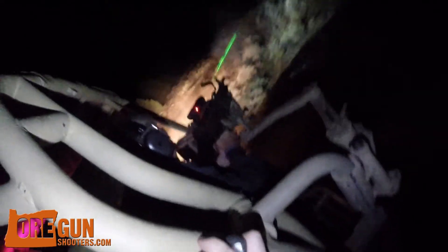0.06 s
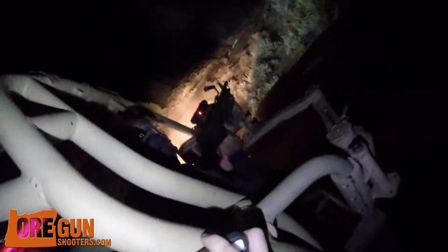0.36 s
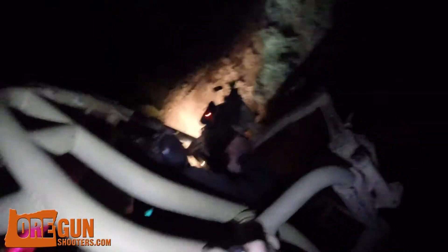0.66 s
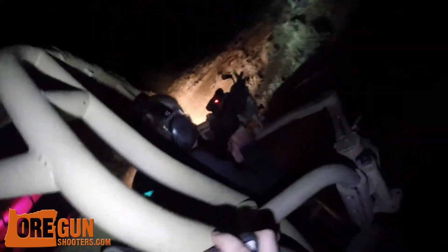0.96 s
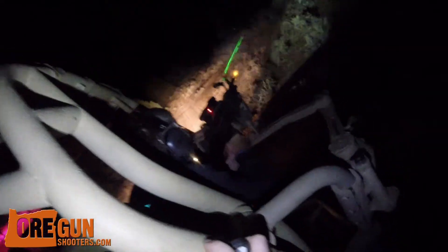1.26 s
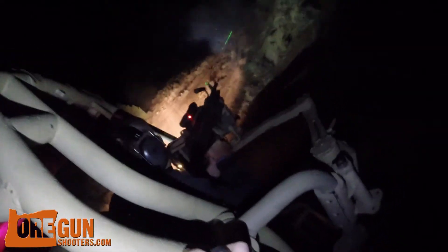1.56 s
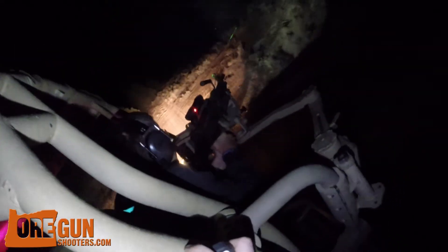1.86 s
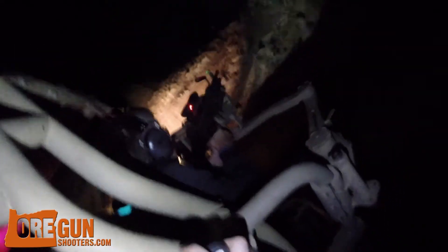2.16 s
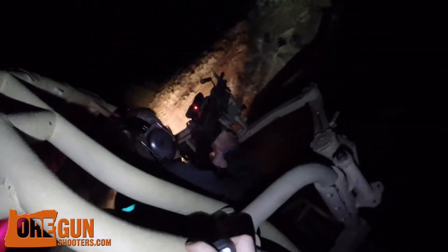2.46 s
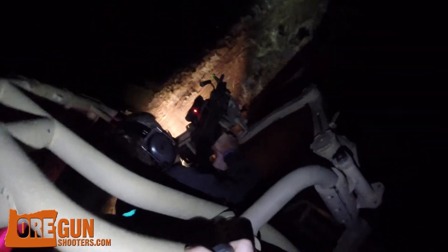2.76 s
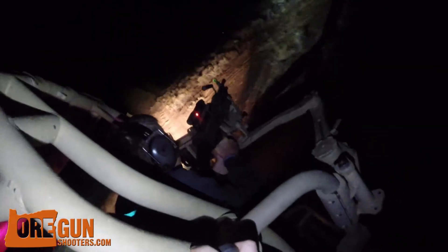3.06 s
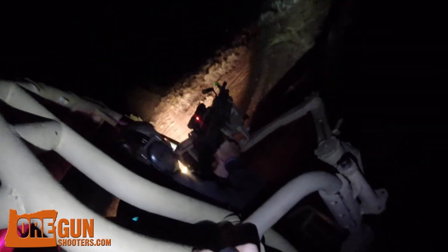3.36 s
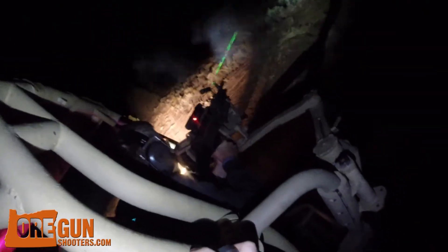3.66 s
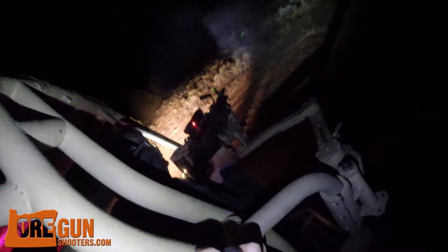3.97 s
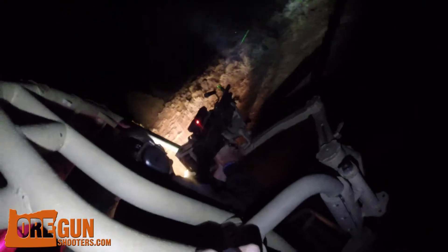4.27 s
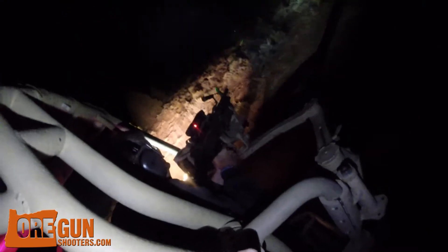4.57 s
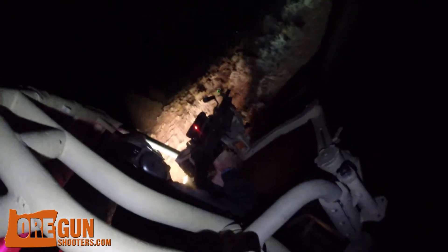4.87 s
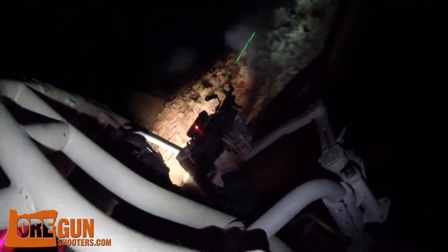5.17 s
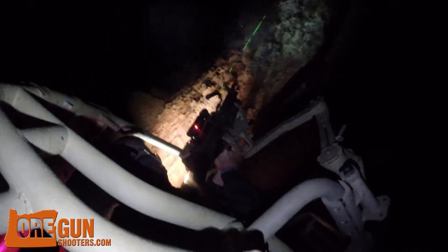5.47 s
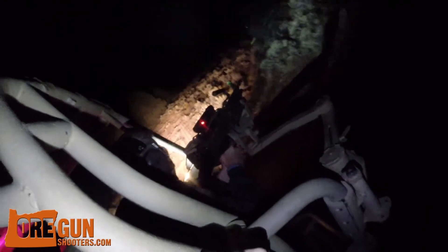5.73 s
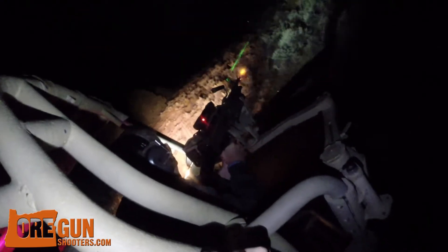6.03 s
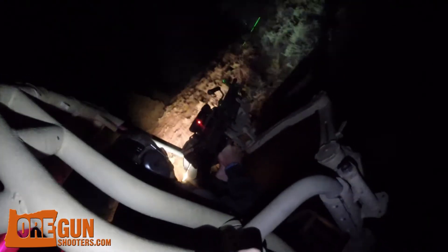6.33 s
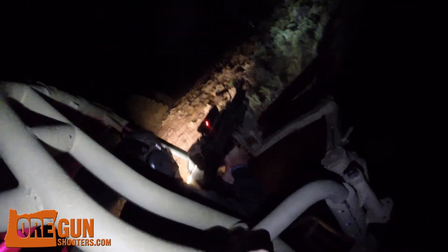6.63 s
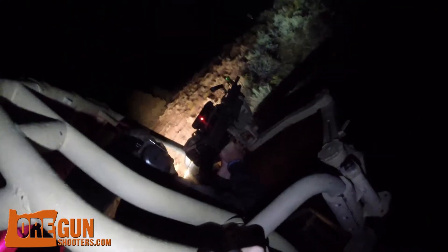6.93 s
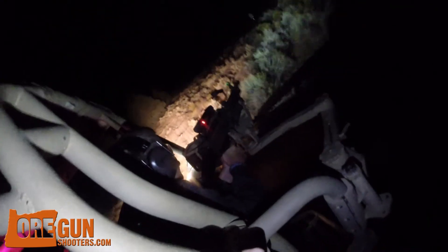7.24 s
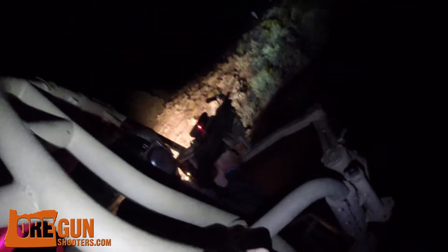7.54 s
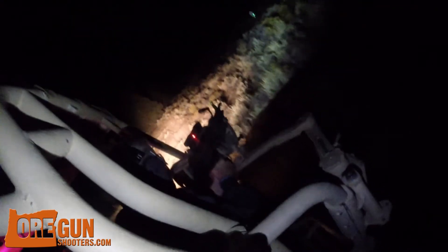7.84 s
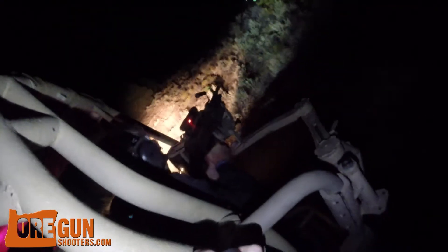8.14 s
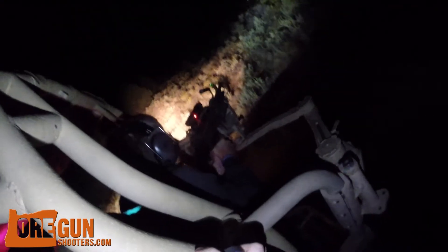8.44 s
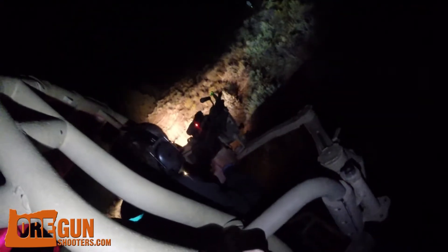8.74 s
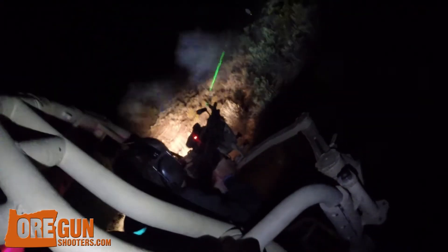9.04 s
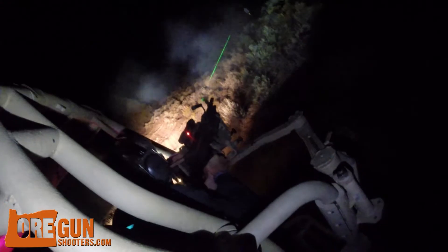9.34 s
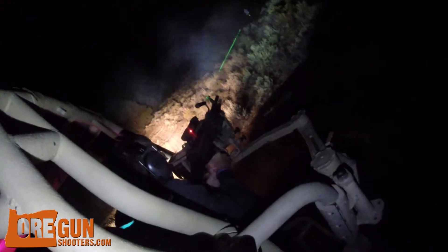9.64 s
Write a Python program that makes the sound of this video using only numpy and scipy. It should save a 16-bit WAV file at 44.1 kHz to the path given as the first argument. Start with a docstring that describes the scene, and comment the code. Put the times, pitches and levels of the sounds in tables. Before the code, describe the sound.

A two-cylinder off-road vehicle engine drones low in open country, with faint belt and gear whines. A light machine gun fires close to the microphone: two rounds right at the start, three at 1.3 seconds and three at 3.6. Two more come at 5.1, a single shot at 5.5 and two at 6.1. Each shot is a sharp, overloaded crack with a bolt clack and a brief ring from the vehicle's frame. Belt links and spent cases knock and ping on the panels, most clearly around 6.4 and 9.1 seconds. Brush and a far hillside return echoes lasting up to two seconds, with faint bullet slaps and ricochets. The engine ducks under each burst and swells back. From about 6.5 seconds it slows, dropping to idle by 9, when a final four-round burst fires and echoes away.

```python
"""Open country at night, aboard an off-road vehicle whose two-cylinder engine drones, then falls to idle.
A light machine gun fires short bursts: the bolt slides forward, each muzzle blast rings the frame,
and belt links and spent cases drop on the panels. Brush and a far hillside return the reports,
bullets slap into the slope, and the drive belt and gears whine faintly. Every shot overloads
the microphone, and the gain control ducks the engine and lets it swell back."""
import sys
import numpy as np
from scipy.fft import rfft, irfft, next_fast_len
from scipy.io import wavfile
from scipy.ndimage import uniform_filter1d, minimum_filter1d, map_coordinates

SR = 44100
rng = np.random.default_rng(int(sys.argv[2]) if len(sys.argv) > 2 else 0)


def put_to_file(sound):
    """Save the sound as 16-bit audio at rate SR, in the file named by the first command-line argument."""
    columns = np.atleast_2d(sound).T  # one column per channel
    safe = np.clip(columns, -1, 1)
    whole_steps = np.round(safe * 32767)
    wavfile.write(sys.argv[1], SR, whole_steps.astype(np.int16))


N = 427769


def amp(db):
    """Decibels to amplitude."""
    return np.exp(np.asarray(db) * (np.log(10) / 20))


def along(points, hz):
    """Read an EQ curve of (f/Hz, level/dB) points on a log frequency axis."""
    freqs, levels = np.transpose(points)
    return np.interp(np.log(hz + 1), np.log(freqs + 1), levels)


def wobble(rate, step=12):
    """Smooth random modulation, rate knots a second."""
    steps = np.arange(0, N, step)
    knots = rng.standard_normal(int(N * rate / SR) + 4)
    return np.interp(np.arange(N), steps, map_coordinates(knots, [steps * rate / SR]))


def filtered(x, response):
    """Pass x through a complex frequency response."""
    size = next_fast_len(len(x) + 8192)
    return irfft(rfft(x, size) * response(np.fft.rfftfreq(size, 1 / SR)), size)[:len(x)]


def noise(spectrum):
    """Coloured noise of rms 1."""
    x = filtered(rng.standard_normal(N), lambda hz: amp(along(spectrum, hz)))
    return x / np.sqrt(np.mean(x ** 2) + 1e-20)


def add(track, s, sound):
    """Mix a sound into a track at s seconds."""
    start = max(round(s * SR), 0)
    track[start:start + len(sound)] += sound[:max(N - start, 0)]


def fade(t, t60):
    """A decay that falls 60 dB in t60 seconds."""
    return np.exp(-np.log(1000) * t / t60)


def puffs(events, spectrum, rise, t60):
    """A noise hit at each (t/s, level/dB); overlapping hits add in power."""
    t = np.arange(int((t60 + rise) * SR)) / SR
    envelope = -np.expm1(-t / rise) * fade(t, t60)
    power = np.zeros(N)
    for s, db in events:
        add(power, s, (amp(db) * envelope) ** 2)
    return np.sqrt(power) * noise(spectrum)


# engine speed, cruising and then falling to idle: t/s, working-cycle rate/Hz
CRUISE = [(0.0, 35.2), (0.62, 33.6), (1.02, 35.2), (1.28, 34.2), (4.49, 33.6), (5.9, 33.1)]
SLOWDOWN = [(6.35, 33.2), (7.23, 30.6), (7.76, 30.5), (7.92, 28.2), (8.17, 24.3), (8.55, 22.6),
            (8.91, 16.8), (9.25, 14.7), (9.7, 14.2)]
# the engine's harmonics: multiple of the cycle rate, level/dB
ENGINE_HARMONICS = [(1, -16), (2, -1), (3, -10), (4, 0.5), (5, -11), (6, -11.5), (7, -11.5), (8, -10),
                    (9, -17), (10, -13), (11, -17), (12, -9), (13, -11), (15, -11.5), (16, -10), (18, -16),
                    (20, -10)]
# EQ of the exhaust pipe, the engine clatter and the jolting chassis: f/Hz, level/dB
PIPE_EQ = [(14, -3.5), (40, 1), (70, 0.5), (120, 9), (137, 2), (165, -16.5), (240, -3.5), (340, -10),
           (460, -6), (600, -11.5), (800, -16)]
CLATTER_EQ = [(30, -18.5), (100, -9), (180, -15.5), (280, -17.5), (450, -19.5), (700, -22.5), (1050, -27),
              (1500, -22.5), (1800, -28), (2600, -32), (4700, -38), (7400, -44), (8500, -51),
              (11500, -50.5), (14500, -63.5), (16000, -78.5)]
RUMBLE_EQ = [(5, -19.5), (14, 5.5), (28, -2), (50, -14), (110, -15), (200, -23), (500, -51), (1500, -100)]


def engine(cruise_hz=34, step=30):
    """Crank harmonics drone through the exhaust, clatter beats with the firings, the chassis rumbles."""
    speed = np.interp(np.arange(N) / SR, *np.transpose([*CRUISE, *SLOWDOWN]))
    octaves_down = np.log2(cruise_hz / speed)  # slower is quieter and less even
    unevenness = .003 + .017 * octaves_down ** 2
    angle = 2 * np.pi * np.cumsum(speed * (1 + unevenness * wobble(12))) / SR
    exhaust = np.zeros(N)
    for k, db in ENGINE_HARMONICS:
        strength = np.repeat(amp(db + along(PIPE_EQ, k * speed[::step])), step)[:N]
        exhaust += strength * np.cos(round(k) * angle - .12 * k * k)  # the pipe smears each pulse
    exhaust *= amp(-40 - 7.5 * octaves_down + .94 * wobble(9.3))
    beat = 1 + .19 * np.cos(angle) + .12 * np.cos(2 * angle)
    clatter = amp(-48 - 7 * octaves_down + .71 * wobble(9.9)) * beat * noise(CLATTER_EQ)
    rumble = amp(-43.5 - 1.5 * octaves_down + 1.2 * wobble(2.5)) * noise(RUMBLE_EQ)
    return exhaust + clatter + rumble


# trigger pulls and their impacts: t/s, rounds, shot spacing/s, shot to strike/s, strike level/dB,
# strike to ricochet/s, ricochet level/dB, impact change per round as the aim drifts/dB
BURSTS = [(0.0605, 2, .0807, .458, -37, .11, -47, 7.5), (1.28, 3, .0804, .296, -32, .146, -29.5, 0),
          (3.634, 3, .0792, .341, -20, .172, -23, -9), (5.0965, 2, .0789, .19, -29, .14, -39, 0),
          (5.4622, 1, .08, .175, -27.5, .145, -31.5, 0), (6.1389, 2, .0849, .254, -27.5, .15, -45, 2.5),
          (8.948, 4, .0797, .292, -25, .15, -39, -3)]


def shots(first_heard_db=1.62):
    """Evenly spaced shots as (t/s, level/dB); each burst's first is heard slightly louder."""
    return np.array([(start + k * period, first_heard_db * (k == 0))
                     for start, count, period, *_ in BURSTS for k in range(round(count))])


# EQ of the bolt's scrape and clack: f/Hz, level/dB
BOLT_EQ = [(200, -18.5), (2000, -9), (3300, 1), (4600, -6), (7500, -5), (11000, -12), (15000, -23.5),
           (16000, -49)]


def bolt(lead_s=.045, pause_s=.15, ping_hz=3250):
    """Before a burst the sear pings free and the bolt scrapes forward; it clacks shut on every round."""
    times = shots()[:, 0]
    t = np.arange(int(lead_s * SR)) / SR
    stroke = amp(np.interp(t, [0, .011, .014, .024, .04], [-42, -48.5, -34.5, -45, -39]))
    ping = amp(-17.5) * np.sin(2 * np.pi * ping_hz * t) * -np.expm1(-t / .0067) * fade(t, .014)
    travel, sear = np.zeros(N), np.zeros(N)
    for s in times[np.diff(times, prepend=-1) > pause_s]:
        add(travel, s - lead_s, stroke)
        add(sear, s - lead_s, ping)
    closings = shots() - [.006, 0]  # 6 ms ahead of each blast
    clack = amp(-17.5) * puffs(closings, BOLT_EQ, rise=.0005, t60=.014)
    return travel * noise(BOLT_EQ) + sear + clack


# resonances of the vehicle's frame and panels: f/Hz, width/Hz, level/dB
FRAME_MODES = [(239, 170, -4.5), (448, 130, -5.5), (655.7, 130, -4.5), (851, 190, 0), (1261.5, 280, 0.5),
               (1619, 210, -8), (1990, 170, -4), (2283, 170, 0), (2747, 510, -4.5), (3420, 890, -8),
               (3835, 350, -1.5), (4910, 350, -4), (5170, 130, -16), (6427, 170, -9), (10130, 620, -24.5),
               (11100, 690, -26.5)]
# EQ of the muzzle gas's crack and of its scatter off the ground: f/Hz, level/dB
CRACK_EQ = [(30, -19), (110, -10.5), (250, 4), (3000, 2), (6500, 0.5), (8000, -11.5), (11500, -9),
            (15000, -20.5), (16500, -43)]
GROUND_EQ = [(30, -11.5), (100, -10), (180, -6), (420, 6.5), (700, 0.5), (1250, 6.5), (2000, -2.5),
             (4000, -11), (7000, -18), (11000, -33), (15000, -30.5)]


def muzzle_blast():
    """Each shock front rings the frame alike; turbulent gas and ground scatter vary from shot to shot."""
    def frame(hz):
        response = 0
        for k, (centre, width, db) in enumerate(FRAME_MODES):
            resonance = 1j * hz * width / (centre ** 2 - hz ** 2 + 1j * hz * width)
            # squared, each resonance builds up briefly, as reflections arrive
            response += (-1) ** k * amp(db) * resonance ** 2
        return response

    shocks = np.zeros(N)
    for s, db in shots():
        add(shocks, s, -amp([db + 47]))
    gas = amp(12) * puffs(shots(), CRACK_EQ, rise=.00049, t60=.023)
    ground = amp(-2.5) * puffs(shots(), GROUND_EQ, rise=.003, t60=.078)
    return filtered(shocks, frame) + gas + ground


# EQ of the scatter off the brush and of all sound from the hillside: f/Hz, level/dB
BRUSH_EQ = [(40, -9.5), (150, -1.5), (500, 1.5), (1500, -6), (2800, -8), (6500, -7.5), (8200, -14),
            (11000, -18), (15000, -29), (16000, -60.5)]
HILL_EQ = [(60, -12), (500, -14), (1500, 0), (4000, -2), (6800, -7.5), (8300, -22.5), (10500, -19.5),
           (13000, -41), (16000, -49)]


def echoes():
    """Uneven terrain returns the reports in lumps: a short tail from brush, a long one from the hill."""
    brush = amp(-18.5 + 2 * wobble(110)) * puffs(shots(), BRUSH_EQ, rise=.0033, t60=.42)
    hill = amp(-41 + 1.8 * wobble(45)) * puffs(shots(), HILL_EQ, rise=.05, t60=2.02)
    return brush + hill


# EQ of a knock on a panel: f/Hz, level/dB
KNOCK_EQ = [(100, -15), (500, -9.5), (900, -1.5), (1350, 1), (2200, -8.5), (4000, -13.5), (6500, -15),
            (8000, -27), (15000, -42.5)]


def belt_links(bounces=4, settle_db_per_s=34):
    """Every round throws out a belt link that bounces a few times, later bounces tending softer."""
    thrown = np.repeat(shots()[:, 0], bounces)
    lateness, softness = rng.random((len(thrown), 2)).T
    delay = .047 + .51 * lateness
    level_db = -18.5 - settle_db_per_s * delay - 10 * softness
    return puffs(zip(thrown + delay, level_db), KNOCK_EQ, rise=.0008, t60=.04)


# the loudest cases landing: t/s, knock level/dB, ring level/dB, ring focus f/Hz
CASE_LANDINGS = [(.217, -12, -55, 8300), (.425, -36, -50, 7300), (.803, -40, -43, 4900),
                 (1.498, -11, -56, 10300), (4.028, -27, -48, 8300), (6.349, -17, -62, 8300),
                 (6.412, -2.5, -41.5, 10300), (6.493, -16, -54, 8300), (9.077, -2, -43, 10300)]
# the ring of a spent case: f/Hz, level/dB, t60/s
BRASS_MODES = [(4900, -1, .12), (7080, -8, .7), (8290, -7, .75), (10290, -3, .38), (10620, -2, .18),
               (11500, -5, .1), (12420, -3, .26)]


def spent_cases(focus_db_per_octave=24, flutter_db=3):
    """Brass knocks on a panel; the spot struck decides which mode rings most, tumbling adds flutter."""
    t, ring = np.arange(SR) / SR, np.zeros(N)
    for s, _, ring_db, focus_hz in CASE_LANDINGS:
        for hz, db, t60 in BRASS_MODES:
            tumble = np.interp(t, np.linspace(0, 1, 90), rng.standard_normal(90))
            off_focus_db = focus_db_per_octave * abs(np.log2(hz / focus_hz))
            level_db = ring_db + db - off_focus_db + flutter_db * tumble
            add(ring, s, amp(level_db) * np.sin(2 * np.pi * hz * t + tumble) * fade(t, t60))
    knocks = puffs([row[:2] for row in CASE_LANDINGS], KNOCK_EQ, rise=.00092, t60=.0196)
    return ring + knocks


def bullet_strikes():
    """Each bullet crackles into the stony slope after a delay set by the aim, then ricochets."""
    hits = []
    for start, count, period, delay, strike_db, skip, ricochet_db, drift_db in BURSTS:
        for k in range(round(count)):
            landing = start + k * period + delay
            hits += [(landing, strike_db + k * drift_db), (landing + skip, ricochet_db + k * drift_db)]
    crackle = amp(1.8 * wobble(450))
    return crackle * puffs(hits, HILL_EQ, rise=.0034, t60=.098)


# drive belt and gear whines: start t/s, end t/s, f/Hz, relative level/dB, pitch wander width/Hz
DRIVE_WHINES = [(0.54, 1.26, 694, -62, 12), (2.06, 3.6, 1555, -66, 14), (7.04, 8.07, 2611, -66, 7.9),
                (7.2, 9.4, 1497, -73, 30), (4.1, 7.8, 1330, -64.5, 140)]


def drive_whines():
    """The drive belt and gears sing in narrow, slightly unsteady tones that swell and die away."""
    t, whines = np.arange(N) / SR, np.zeros(N)
    for start, end, hz, db, width in DRIVE_WHINES:
        swell = np.sin(np.pi * np.clip((t - start) / (end - start), 0, 1))
        pitch = hz + width / 2 * wobble(40)
        whines += amp(db + 6) * swell * np.sin(2 * np.pi * np.cumsum(pitch) / SR)
    return whines


# the microphone's peaks for diffuse sound: f/Hz, width/Hz, level/dB
MIC_PEAKS = [(1350, 500, 3.5), (2250, 460, 5.5), (3735, 620, 11), (4920, 390, 5.5), (6250, 690, 4.5),
             (9300, 790, 3)]


def mic_colour(hz):
    """The microphone's casing colours diffuse sound with flat-topped peaks in the mids and treble."""
    boost_db = sum(db / (1 + (2 * (hz - centre) / width) ** 4) for centre, width, db in MIC_PEAKS)
    return amp(boost_db - 3)


def scene():
    """The mix: the gun up close, echoes and impacts far off, the vehicle as a bed underneath."""
    gun = muzzle_blast() + bolt() + spent_cases() + belt_links()
    distance = filtered(echoes() + bullet_strikes(), mic_colour)
    # the nearby engine takes on less of the microphone's colour
    bed = filtered(engine(), lambda hz: (mic_colour(hz) / mic_colour(0)) ** .16)
    return (gun + distance + bed + drive_whines())[None]


def gain_control(x, ceiling_db, hold_s, release_db_per_s, ahead_s):
    """A look-ahead limiter: ducks peaks to the ceiling, holds, then lets the level swell back."""
    over_db = np.maximum(20 * np.log10(np.abs(x) + 1e-9) - ceiling_db, 0)
    span, lead = 2 * int(hold_s * SR / 2) + 1, int(ahead_s * SR)
    coming_db = np.pad(over_db, (0, lead))[lead:]
    held_db = -minimum_filter1d(-coming_db, span, origin=span // 2, mode="constant")
    recovery_db = release_db_per_s * np.arange(N) / SR
    cut_db = np.maximum.accumulate(held_db + recovery_db) - recovery_db
    return x * amp(-uniform_filter1d(cut_db, size=88))


# the treble roll-off: f/Hz, level/dB
TREBLE_EQ = [(11500, -1), (15000, -5), (16400, -25.5)]


def record(dry, overload_db=17, hardness=4, top_hz=16400):
    """The microphone saturates, the gain control pumps, and the top end is cut."""
    saturated = dry[0] / (1 + np.abs(dry[0] / amp(overload_db)) ** hardness) ** (1 / hardness)
    ducked = gain_control(saturated, ceiling_db=-.43, hold_s=.17, release_db_per_s=19.5, ahead_s=.0061)
    return filtered(ducked, lambda hz: amp(along(TREBLE_EQ, hz)) * (hz < top_hz))[None]


dry = scene()
out = record(dry)
put_to_file(out)
```